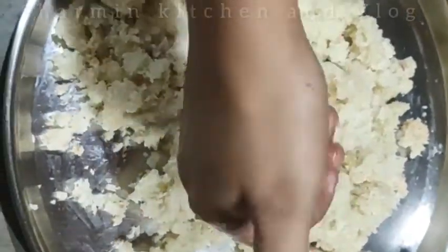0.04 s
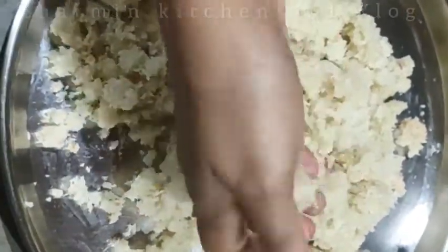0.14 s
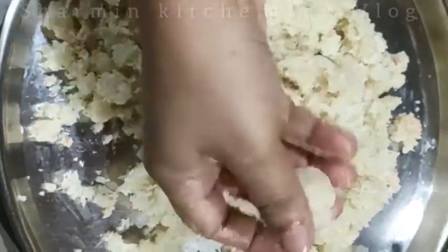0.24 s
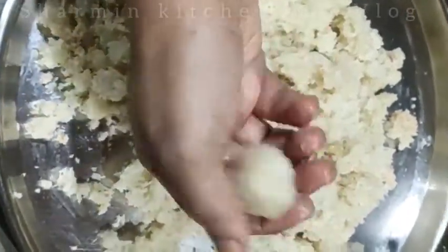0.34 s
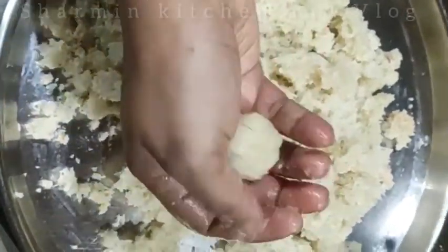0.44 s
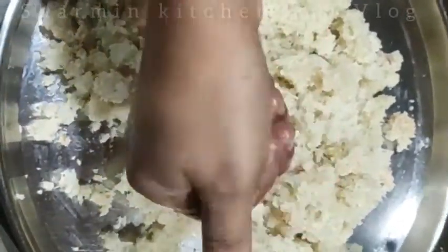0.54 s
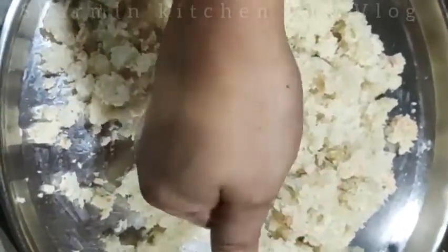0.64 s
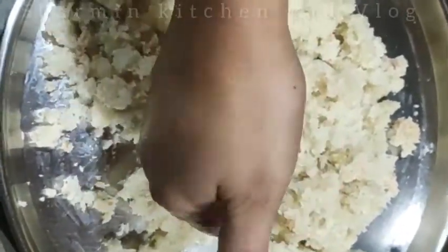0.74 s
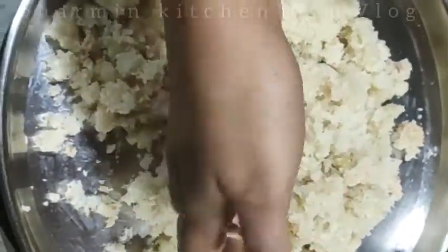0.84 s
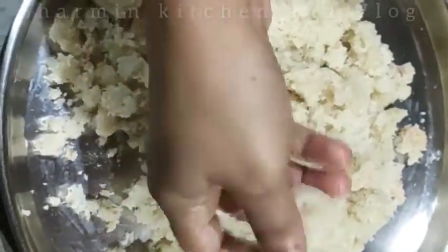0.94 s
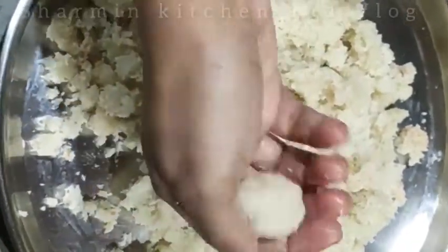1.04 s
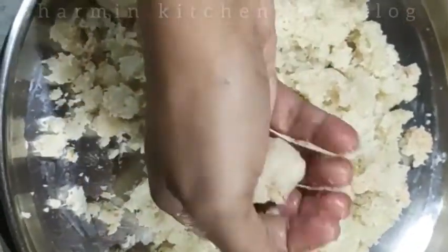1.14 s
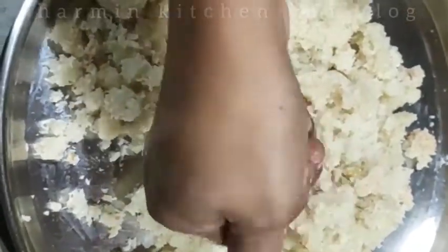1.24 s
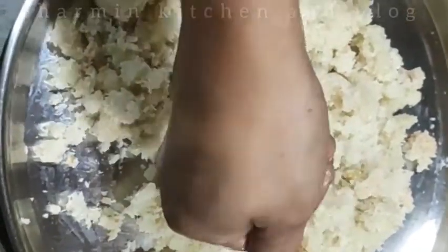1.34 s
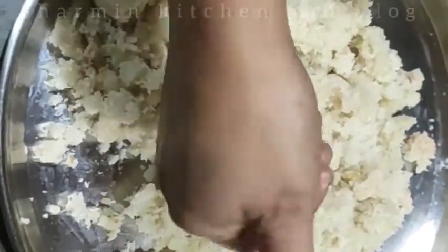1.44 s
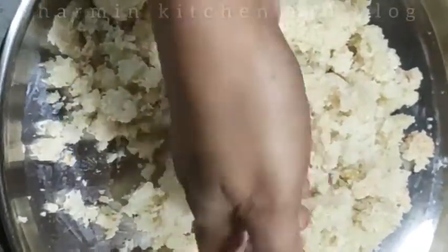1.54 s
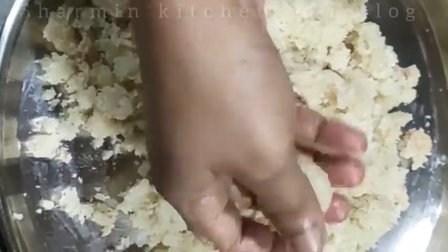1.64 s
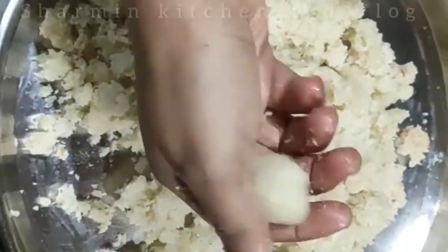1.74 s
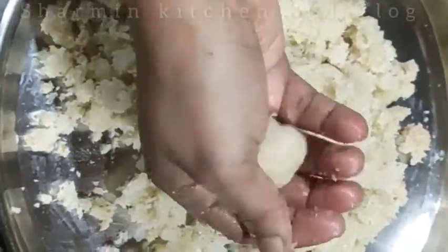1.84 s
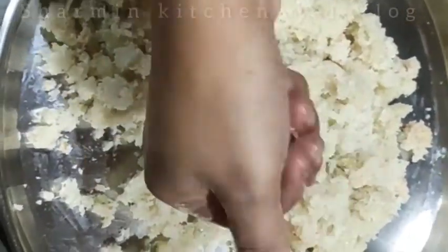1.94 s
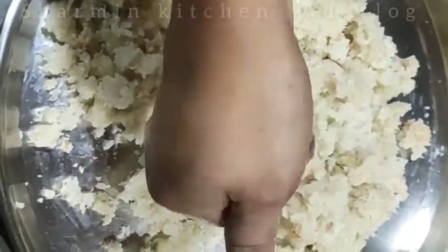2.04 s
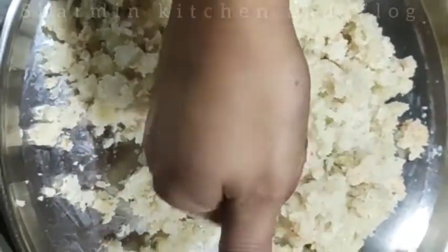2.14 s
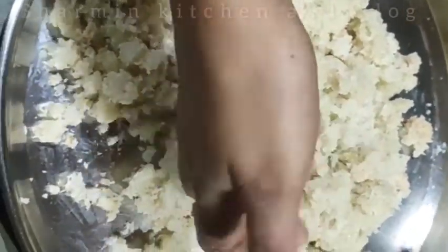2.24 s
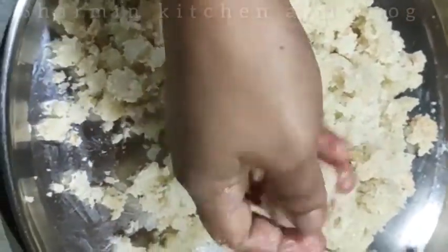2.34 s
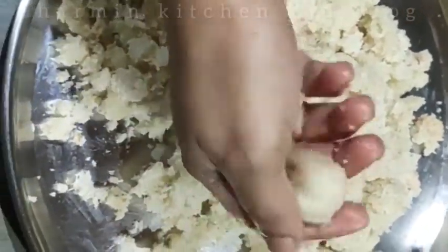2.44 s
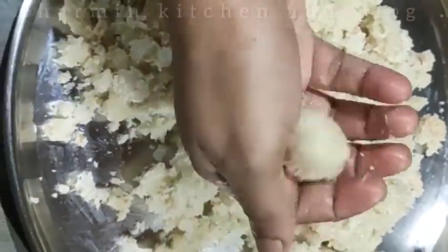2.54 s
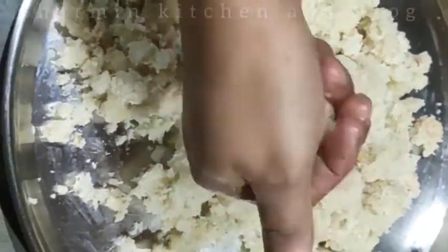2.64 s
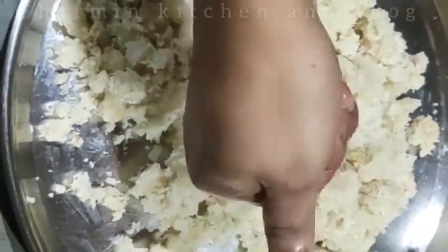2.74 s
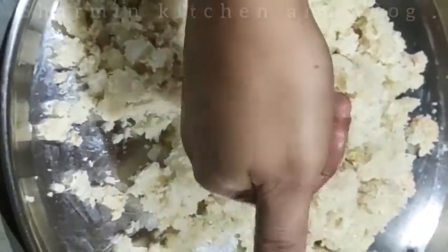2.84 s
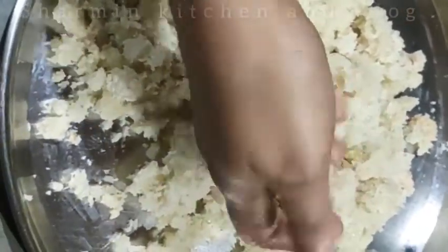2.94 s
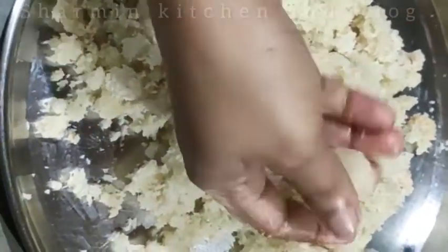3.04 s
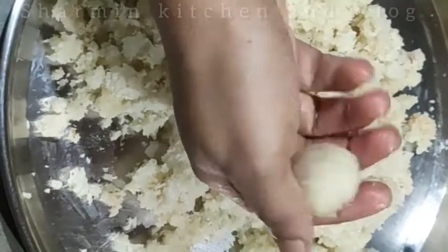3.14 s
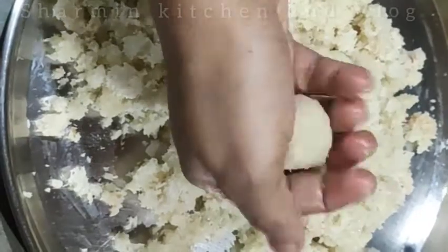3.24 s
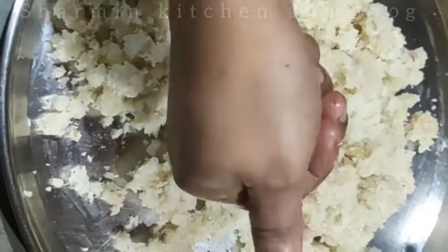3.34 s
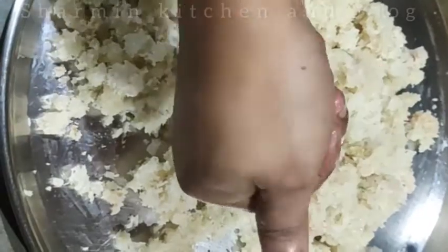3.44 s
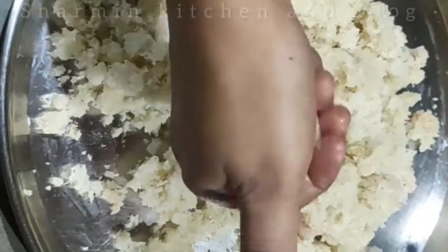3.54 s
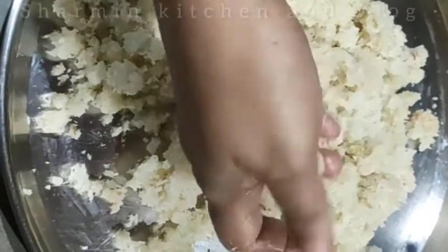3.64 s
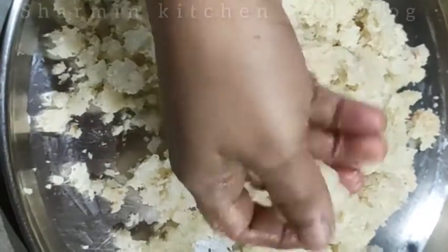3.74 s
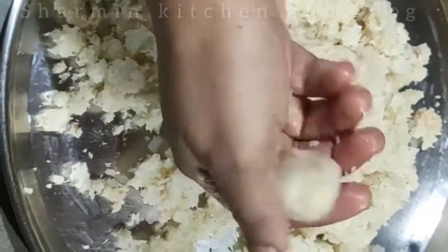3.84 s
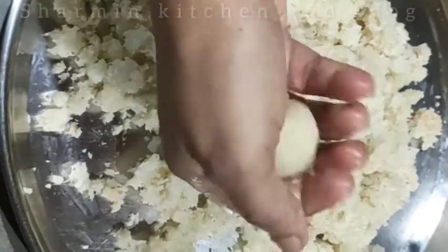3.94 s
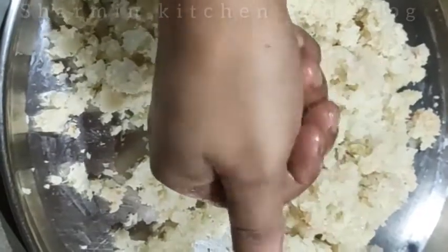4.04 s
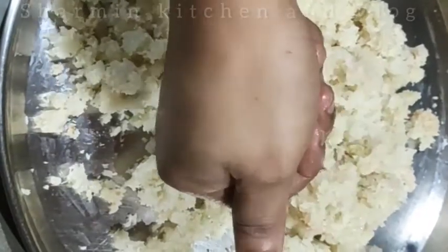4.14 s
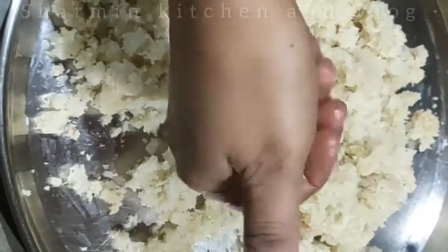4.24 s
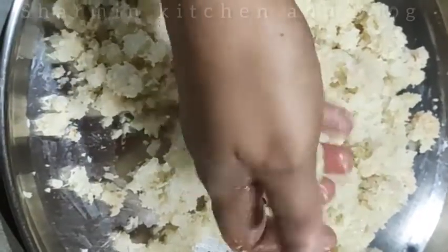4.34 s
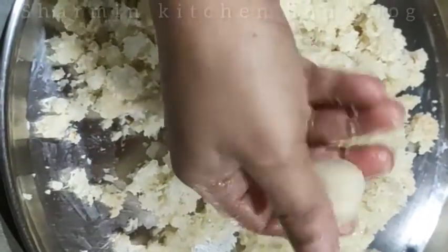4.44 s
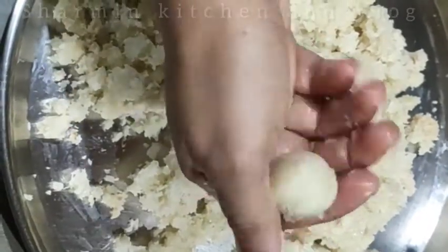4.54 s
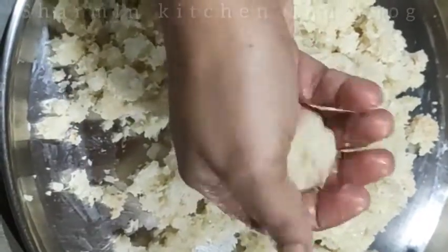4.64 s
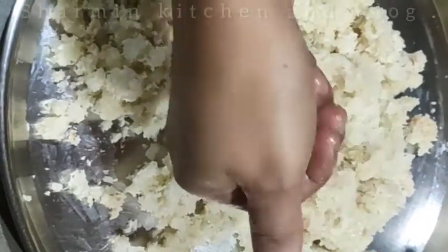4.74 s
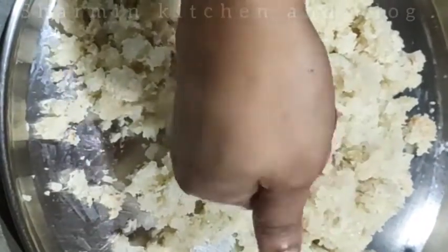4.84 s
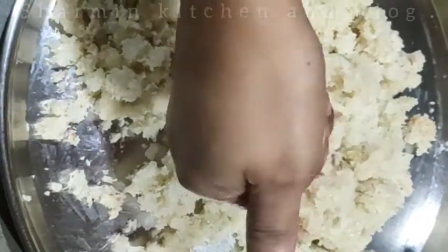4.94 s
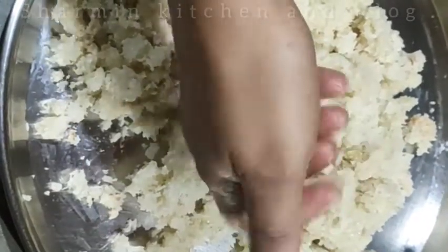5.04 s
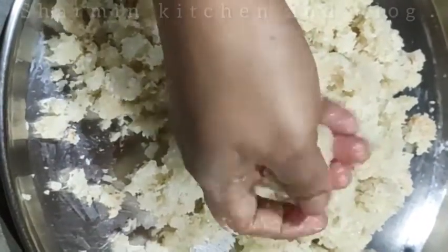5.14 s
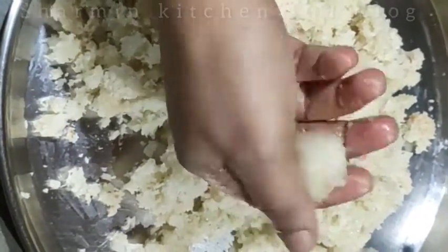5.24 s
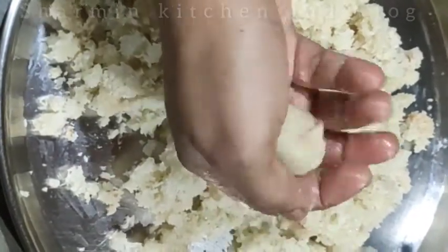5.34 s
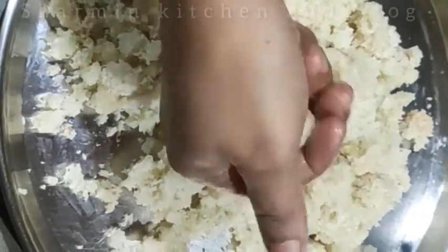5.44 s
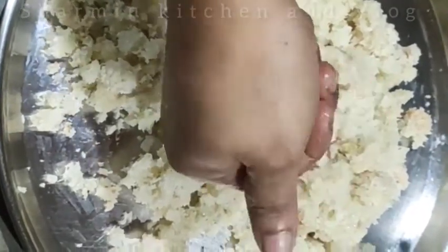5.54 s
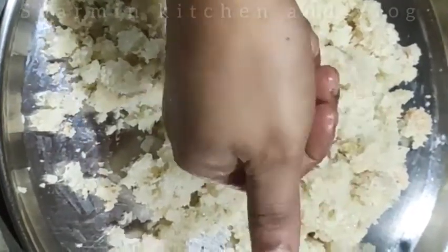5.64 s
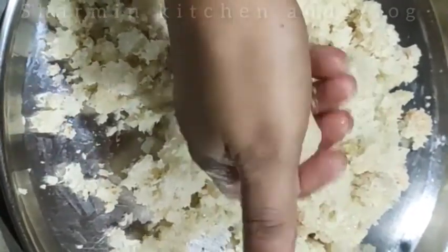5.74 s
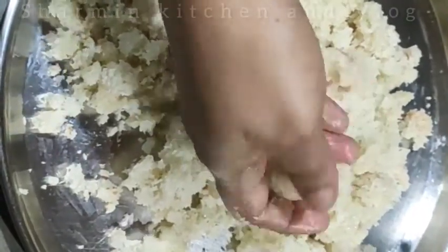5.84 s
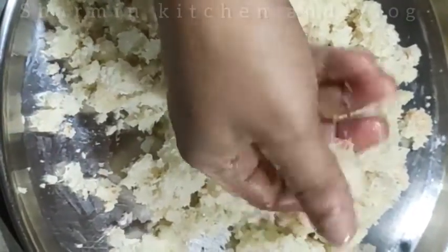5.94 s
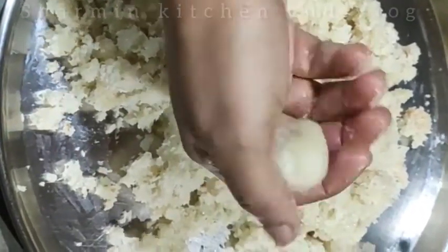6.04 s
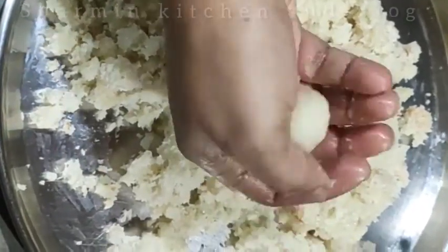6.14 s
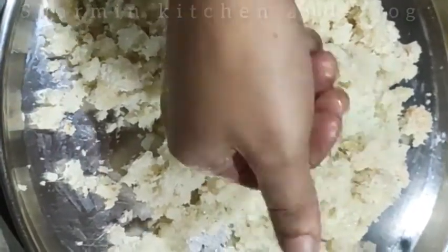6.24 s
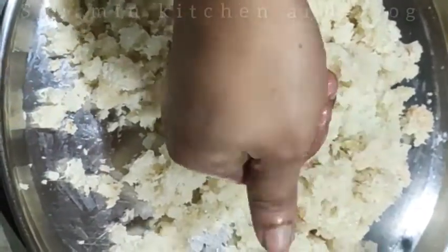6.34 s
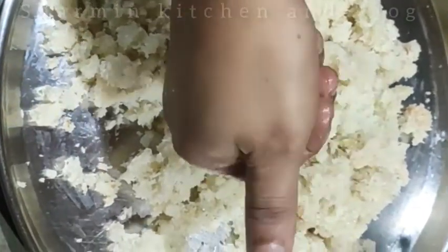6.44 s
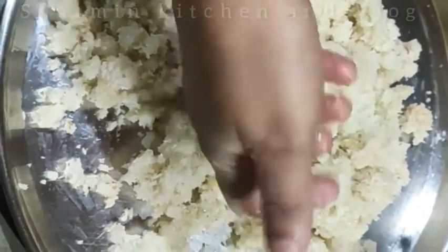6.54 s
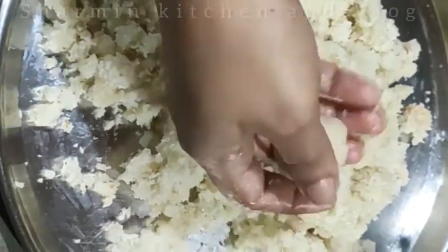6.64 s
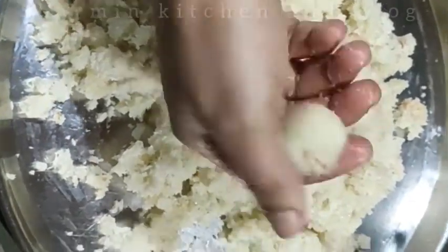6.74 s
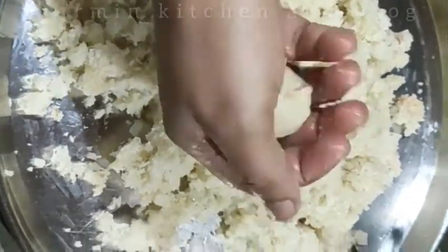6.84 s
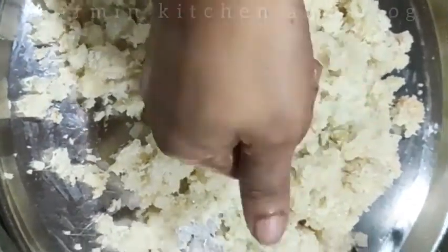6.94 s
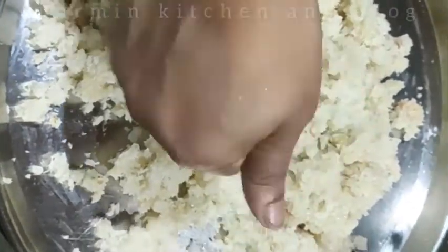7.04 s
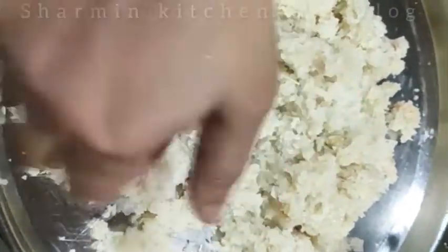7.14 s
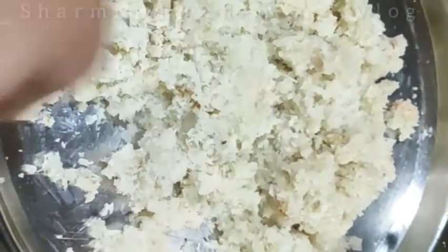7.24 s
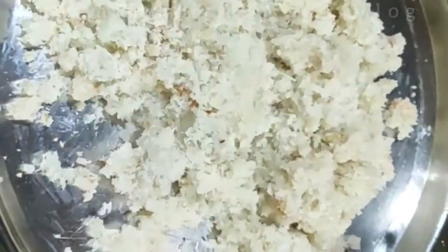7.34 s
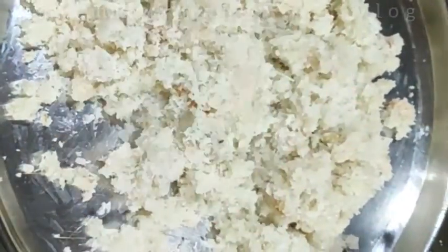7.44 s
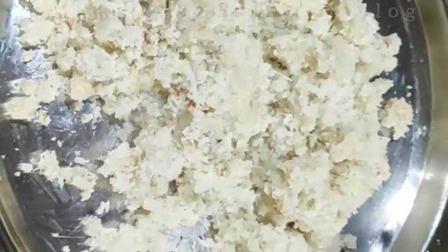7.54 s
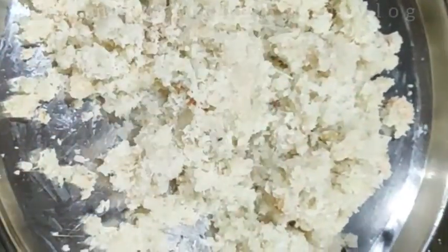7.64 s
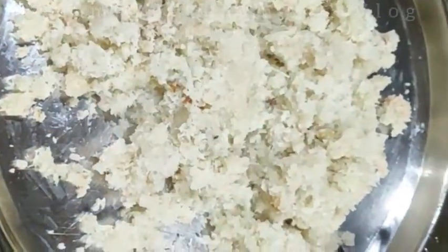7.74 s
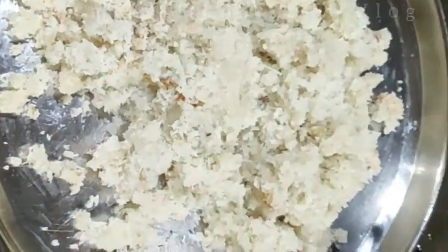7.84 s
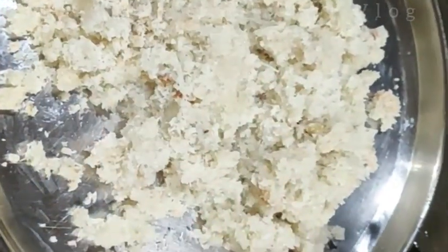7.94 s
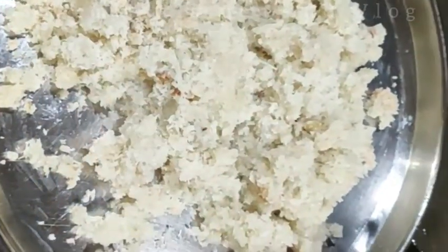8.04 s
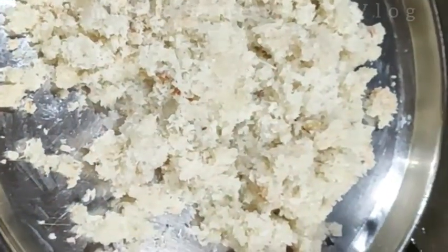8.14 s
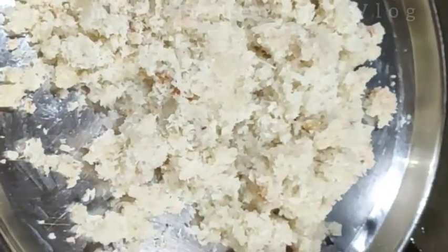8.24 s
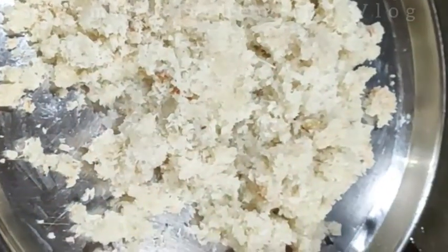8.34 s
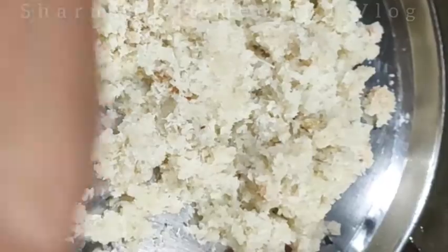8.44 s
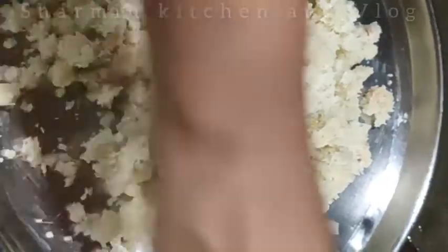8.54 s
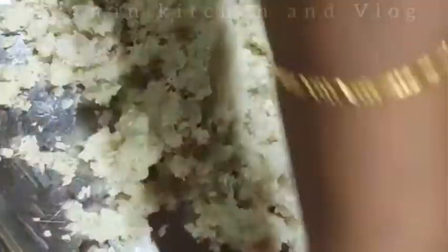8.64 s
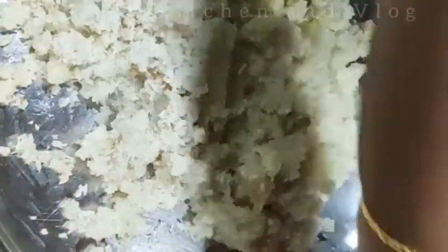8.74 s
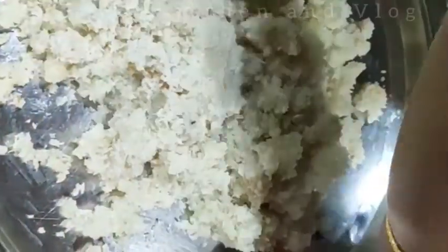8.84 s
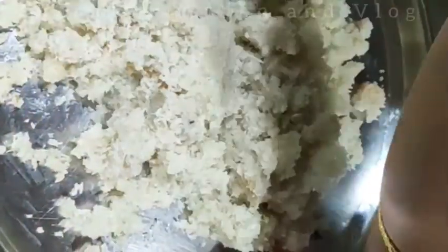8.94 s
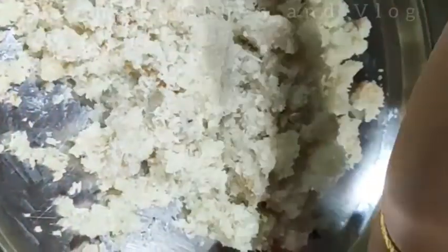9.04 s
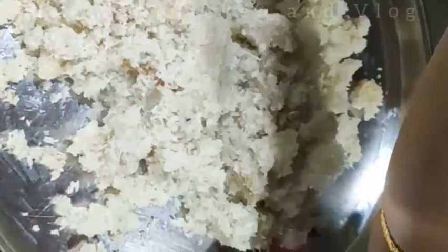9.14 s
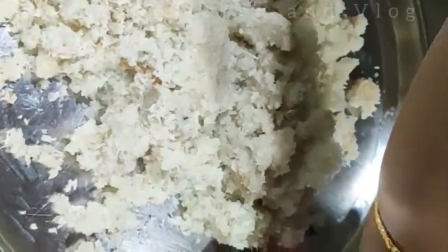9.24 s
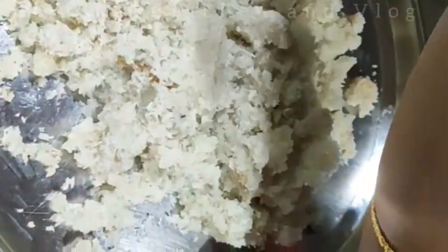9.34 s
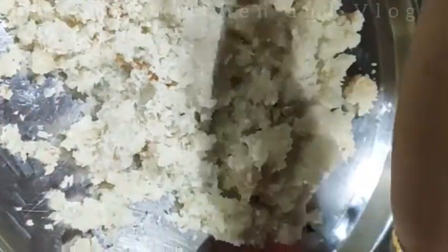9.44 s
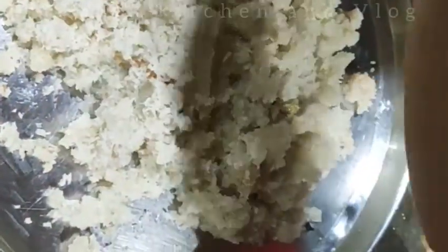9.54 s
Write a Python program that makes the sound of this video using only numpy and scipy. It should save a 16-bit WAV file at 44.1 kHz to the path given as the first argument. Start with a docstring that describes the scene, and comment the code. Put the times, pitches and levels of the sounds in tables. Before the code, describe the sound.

In a small hard-walled kitchen with low hum and very faint high whistles, damp coconut shreds crunch and squelch in bunched squeezes, dotted with wet clicks. A quieter passage has only slight rubbing and a few pops. Later, lumps and fingers thud on a steel plate, its ring muffled by the crumbs, and the last second brings louder gritty scrapes. Close stereo microphone, with brief low air rumbles.

```python
"""A hand squeezes sugared grated coconut above a steel plate in a small kitchen.
Throughout: filtered-noise room hum, thin narrow-band whistles and low gusts of air at the microphone.
From the start: moist shreds hiss and squelch as bunched random grains; sticky pops ring, skin squeaks and rubs.
From about 7 s: fingers knock, scrape and once squeak on the plate; blows and drag drive its damped resonances."""
import sys
import numpy as np
from scipy import signal
from scipy.fft import rfft, irfft, next_fast_len
from scipy.io import wavfile

SR = 44100
rng = np.random.default_rng(int(sys.argv[2]) if len(sys.argv) > 2 else 0)


def persist_wave(psi):
    """Save psi, clipped to +-1, as 16-bit WAV."""
    counts = np.round(np.clip(psi, -1, 1) * 32767).astype(np.int16)
    wavfile.write(sys.argv[1], SR, np.atleast_2d(counts).T)


N = 422919
TIME_S = np.arange(N) / SR
FFT_SIZE = next_fast_len(N + 8192, True)
BINS_HZ = np.maximum(np.fft.rfftfreq(FFT_SIZE, 1 / SR), 1)

# All table levels are relative: layer gains and the ports follow.
# In tables with hold_s, the rise ends at start_s.
# room spectrum: pitch_hz, density_db
ROOM_SPECTRUM = [(12, -24), (20, 6), (45, -5.5), (91, -16.5), (154, -12), (248, -23.5), (1220, -38),
                 (2260, -29.5), (2460, -40), (4060, -38.5), (5680, -39.5), (6360, -38), (16000, -38.5)]
# steady whistles: pitch_hz, width_hz, level_db
WHISTLES = [(160.7, 27, -68), (2495, 185, -71.5), (5680, 470, -71.5)]
# highest whistle: swells, slides up, fades, then returns faintly near its first pitch: time_s, pitch_hz, level_db
TOP_WHISTLE = [(0, 6900, -80), (2.7, 6900, -74), (2.9, 6880, -69.5), (4.8, 6880, -71.5), (4.88, 7200, -74),
               (4.96, 8100, -69), (5.08, 8600, -88), (6.2, 6950, -79)]
# air spectrum: pitch_hz, density_db
AIR_SPECTRUM = [(18, 5), (45, -0.5), (70, -13.5), (130, -17.5), (220, -32.5), (400, -39), (700, -71)]
# the moving arm pushes air over the microphone: start_s, hold_s, level_db
GUSTS = [(1.02, 0.055, -41), (1.2, 0.21, -45), (1.5, 1.63, -54.5), (3.53, 0.02, -48), (3.75, 0.18, -51),
         (6.78, 0.22, -48.5), (9.1, 0.21, -50.5)]
# small dull taps near the microphone: start_s, peak_db
TAPS = [(6.143, -45), (6.511, -37)]
# skin rubs on skin as the ball is turned: start_s, hold_s, level_db
RUBS = [(0.0, 2.82, -66), (3.3, 0.43, -73), (5.05, 0.6, -71), (6.1, 0.94, -70.5)]
# short squeaks of skin, the last a finger on the steel plate: start_s, length_s, first_hz, last_hz, level_db
SQUEAKS = [(2.536, 0.044, 2700, 1630, -55), (3.456, 0.047, 1420, 1470, -60.5), (4.718, .1, 1700, 1780, -70),
           (9.049, 0.012, 2480, 2010, -25)]
# loaded steel plate modes: pitch_hz, width_hz, level_db
PLATE_MODES = [(242.6, 14, -14), (908, 21, -2), (1272, 24, 3.5), (1307, 48, 6), (1670, 21, -1),
               (1750, 38, -1), (1824, 102, 8), (2090, 130, 4), (2140, 130, 1), (2283, 74, 6.5),
               (2440, 92, 5), (2700, 42, -14), (2910, 63, 3.5), (3180, 33, -19), (3375, 27, 2),
               (3760, 24, -2.5), (4390, 70, -4), (4900, 320, -13.5), (6000, 150, -12)]
# fingers and lumps meet the plate: start_s, peak_db, thud_db, crunch_db
KNOCKS = [(7.015, -23, -28, -12), (7.171, -29, -34, -5), (7.543, -33, -31, -11), (7.822, -34, -8.5, -21),
          (8.005, -34, -8.5, -14), (8.1816, -23.5, -19, -25.5), (8.554, -29.5, -33, -45),
          (8.722, -29.5, -26, -21), (8.7798, -21.5, -32, -21), (9.051, -19.5, -29.5, -28),
          (9.0864, -19.5, -46, -19), (9.456, -19.5, -34, -18)]
# fingers drag crumbs over steel: start_s, hold_s, friction_db, pressure_db (low modes)
STROKES = [(7.41, 0.036, -46, -53), (7.54, 0.023, -50, -51.5), (7.63, 0.068, -46.5, -59),
           (7.85, 0.12, -49.5, -57.5), (8.728, 0.013, -51, -73), (8.78, .11, -36.5, -47.5),
           (8.935, 0.04, -36.5, -48), (9.05, 0.043, -40.5, -48), (9.137, 0.026, -33.5, -37.5),
           (9.2, 0.054, -32, -39), (9.28, 0.12, -34, -40.5), (9.457, 0.0053, -31, -34.5),
           (9.525, 0.054, -32, -41)]
# sugar crunch spectrum: pitch_hz, density_db
CRUNCH_SPECTRUM = [(100, -28), (260, -4.5), (420, -11.5), (650, -31), (1050, -11), (1500, -21), (3000, 6),
                   (5000, -13), (6400, -6), (7300, -3), (10000, -8), (16000, -6.5)]
# loudest sticky pops in the palm: start_s, peak_db, pitch_hz, snap_db
POPS = [(1.624, -28, 8630, -16), (1.6438, -24.5, 2700, -22.5), (1.723, -23, 1980, -15),
        (1.937, -25, 2500, -13), (2.09, -25, 3000, -21), (2.3122, -30.5, 3180, -14),
        (2.55, -32.5, 2770, -31), (3.083, -39.5, 6900, -20), (3.312, -40, 2600, -27),
        (5.5607, -27, 2040, -7), (5.629, -28.5, 2800, -12), (6.3663, -28.5, 2440, -3),
        (7.2, -20, 2170, -19), (8.291, -34, 2910, -12), (8.494, -35, 3000, -30), (8.645, -21.5, 3350, -11)]
# the hand closes and shreds slide: start_s, hold_s, hiss_db (dry), squelch_db (moist)
SQUEEZES = [(0.02, 0.091, -54.5, -59.5), (0.22, 0.3, -56, -59), (0.56, 0.12, -45.5, -54.5),
            (0.84, 0.03, -48.5, -54), (1.3, 0.23, -52.5, -59), (1.61, .23, -51.5, -54),
            (1.93, 0.076, -48, -49), (2.1, 0.11, -48.5, -53), (2.38, 0.044, -67, -62.5),
            (2.62, 0.052, -51, -57.5), (3.28, .04, -67, -64.5), (3.45, 0.89, -75, -88),
            (4.96, 0.066, -70, -80), (5.4, 0.057, -74, -67.5), (5.585, .03, -52.5, -54),
            (5.715, 0.015, -47.5, -73), (5.785, 0.014, -73, -61), (6.26, 0.048, -65.5, -70),
            (6.555, 0.011, -60.5, -71), (6.735, .02, -60, -62), (6.81, 0.11, -52.5, -54),
            (7.08, .26, -52, -53), (7.42, 0.57, -51.5, -48.5), (8.07, 0.067, -57, -59),
            (8.28, 0.083, -62.5, -61), (8.43, 0.11, -83, -60.5), (8.62, 0.06, -60, -57)]
# dry shred spectrum: pitch_hz, density_db
HISS_SPECTRUM = [(300, -4), (1000, -18.5), (2000, -3), (4000, -1.5), (6400, -2), (7200, 3), (9000, -0.5),
                 (12000, -1.5), (16000, -4)]
# moist shred spectrum: pitch_hz, density_db
SQUELCH_SPECTRUM = [(150, -11.5), (300, -13), (550, -2.5), (900, -4.5), (1400, -0.5), (1900, -4), (2400, 1),
                    (3100, 2), (4000, -3.5), (6000, -7.5), (15000, -30)]
# left-right likeness of the room: pitch_hz, likeness (0-1)
ROOM_LIKENESS = [(40, 0.54), (170, 0.93), (280, 0.61), (900, 0.18), (9000, 0.049), (14000, 0.95)]
# left-right likeness of the plate: pitch_hz, likeness (0-1)
PLATE_LIKENESS = [(200, 1), (1350, 0.81), (1800, 0.18), (3000, 0.15), (6500, 0.15)]
# left-right likeness of the palm: pitch_hz, likeness (0-1)
PALM_LIKENESS = [(200, 1), (1500, 0.69), (2500, 0.46), (6500, 0)]
# port response difference: pitch_hz, left_minus_right_db
PORT_BALANCE = [(200, 1), (1300, 0.5), (2000, 6), (2800, 9.5), (3300, 7.5), (4300, 3), (5200, -3),
                (6500, 4.5)]

GUST_RISE_DB_PER_S, GUST_FALL_DB_PER_S, CALM_AIR_DB = 192, 63, -58.5
TOP_WHISTLE_CUTOFF_HZ = 160
RUB_RISE_DB_PER_S, RUB_FALL_DB_PER_S = 150, 91
LOW_MODES_BELOW_HZ = 1500
YIELD_S, CRUMBLE_S = 0.0021, 0.0079   # a struck lump starts to give, then crumbles
STROKE_RISE_DB_PER_S, STROKE_FALL_DB_PER_S = 798, 286
POP_LEFT_MINUS_RIGHT_DB = -0.5
SMALL_POPS_PER_S, SMALL_POP_DB = 51, -9   # level against the squelch
SQUEEZE_RISE_DB_PER_S, SQUEEZE_FALL_DB_PER_S = 155, 114
RESTING_HISS_DB, RESTING_SQUELCH_DB = -79, -73   # the ball never lies quite still
PALM_LAG_S = 16 / SR   # left after right
KITCHEN_T60_S = 0.26
MERGE_HZ, PALM_TOP_SHARING, PLATE_TOP_SHARING = 7000, 0.89, 0.37   # sharing 0-1 above MERGE_HZ
CUTOFF_HZ = 15900


def from_db(db):
    """Decibels to gain."""
    return 10 ** (np.asarray(db) / 20)


def rms_one(x):
    """Scale to unit power."""
    return x / np.sqrt(np.mean(x ** 2) + 1e-20)


def at_bins(points):
    """Read a table on a log-frequency axis."""
    hz, value = np.transpose(points)
    return np.interp(np.log(BINS_HZ), np.log(hz), value)


def filtered(x, response):
    """Apply a frequency response."""
    return irfft(rfft(x, FFT_SIZE) * response, FFT_SIZE)[..., :N]


def coloured(x, spectrum):
    """Shape by a spectrum; rms 1."""
    return rms_one(filtered(x, from_db(at_bins(spectrum))))


def cut(x, hz, kind, order=2):
    """Butterworth filter."""
    return signal.sosfilt(signal.butter(order, hz, kind, fs=SR, output="sos"), x + 1e-18)


def resonate(x, hz, width_hz):
    """One resonance with about unit gain at its top."""
    radius = np.exp(-np.pi * width_hz / SR)
    zeros = np.array([1, 0, -1]) * (1 - radius ** 2) / 2
    poles = [1, -2 * radius * np.cos(2 * np.pi * hz / SR), radius ** 2]
    return signal.lfilter(zeros, poles, x + 1e-18)


def drift(rate_hz):
    """Slow random wander with rms 1."""
    return rms_one(filtered(rng.standard_normal(N), 1 / (1 + (BINS_HZ / rate_hz) ** 2)))


def two_ports(pair, likeness):
    """Mix two signals into a partly alike left and right."""
    alike = np.clip(at_bins(likeness), 0, 1)
    middle = filtered(pair[0], np.sqrt((1 + alike) / 2))
    side = filtered(pair[1], np.sqrt((1 - alike) / 2))
    return middle + side * [[1], [-1]]


def grains(per_s, spread_db, clump_db, clump_rate_hz):
    """Tiny slips of uneven size, bunched by stick and slip; each radiates two unrelated ways."""
    born = rng.random(N) < per_s / SR
    sizes = from_db(spread_db * np.minimum(rng.exponential(1, N), 5))
    clumps = from_db(clump_db * drift(clump_rate_hz))
    return rms_one(born * sizes * clumps * rng.standard_normal((2, N)))


def swells(rows, rise_db_per_s, fall_db_per_s):
    """Rise, hold and decay; overlaps add in power. One gain track per dB column."""
    rows, t = np.array(rows), TIME_S[::32]
    start, hold = rows[:, :1], rows[:, 1:2]
    rise_db = -rise_db_per_s * np.maximum(start - t, 0)
    fall_db = -fall_db_per_s * np.maximum(t - start - hold, 0)
    tracks = []
    for db in rows.T[2:]:
        gain = np.linalg.norm(from_db(db[:, None] + rise_db + fall_db), axis=0)
        tracks.append(np.interp(TIME_S, t, gain))
    return tracks


def burst(t, rise_s, fall_s):
    """Exponential build-up to time zero and decay after it."""
    return np.exp(np.minimum(t / rise_s, -t / fall_s))


def add(out, s, sound):
    """Lay a short sound into a track."""
    start = round(s * SR)
    out[:, start:start + sound.shape[-1]] += sound[..., :N - start]


def room():
    """Room rumble and hum: noise shaped by a spectrum."""
    noise = two_ports(rng.standard_normal((2, N)), ROOM_LIKENESS)
    return from_db(-58.5) * coloured(noise, ROOM_SPECTRUM)


def whistle(hz, width_hz):
    """Noise held in two equal narrow resonances."""
    once = resonate(rng.standard_normal((2, N)), hz, width_hz)
    return rms_one(resonate(once, hz, width_hz))


def top_whistle():
    """A narrow band of noise carried on a gliding pitch."""
    s, hz, db = np.transpose(TOP_WHISTLE)
    flutter = cut(rng.standard_normal((2, 2, N)), TOP_WHISTLE_CUTOFF_HZ, "low")
    phase = 2 * np.pi * np.cumsum(np.interp(TIME_S, s, hz)) / SR
    tone = rms_one(flutter[0] * np.cos(phase) + flutter[1] * np.sin(phase))
    return from_db(np.interp(TIME_S, s, db)) * tone


def moving_air():
    """Low turbulent noise; stronger gusts lean to the right port and break into smaller, higher eddies."""
    gust_gain, = swells(GUSTS, GUST_RISE_DB_PER_S, GUST_FALL_DB_PER_S)
    air_gain = np.hypot(gust_gain, from_db(CALM_AIR_DB))
    noise = two_ports(rng.standard_normal((2, N)), ROOM_LIKENESS)
    air = air_gain * coloured(noise, AIR_SPECTRUM)
    gust = np.clip(air_gain / from_db(-42.5), 0, 1)
    air = air + from_db(8.0) * gust ** 2 * resonate(air, 69, 85)
    return air * from_db(np.array([2.5 - 14 * gust, -.8 + 6 * gust]))


def background():
    """Room and whistles, slightly to the left, plus moving air."""
    tones = sum(from_db(db) * whistle(hz, width) for hz, width, db in WHISTLES) + top_whistle()
    return (room() + two_ports(tones, ROOM_LIKENESS)) * from_db([[.8], [-.8]]) + moving_air()


def taps():
    """A single dull pulse with a brief low swing."""
    out, t = np.zeros((2, N)), TIME_S[:SR // 20]
    pulse = cut(cut(1.0 * (t == 0), 400, "low", order=1), 130, "high")
    for s, db in TAPS:
        add(out, s + 0.0013, from_db(db + 2.5) * pulse / pulse.max())
    return out


def skin():
    """Fingers slide over the ball of the thumb: grains through one dull resonance."""
    gain, = swells(RUBS, RUB_RISE_DB_PER_S, RUB_FALL_DB_PER_S)
    slips = grains(per_s=3000, spread_db=2.5, clump_db=0.5, clump_rate_hz=26)
    rub = resonate(two_ports(slips, PALM_LIKENESS), 512, 135)
    return from_db(-3.0) * rms_one(rub) * gain


def squeaks(rasp_hz=220):
    """Uneven stick and slip gives a short rasping glide."""
    out = np.zeros((2, N))
    for s, length_s, first_hz, last_hz, db in SQUEAKS:
        n = round(length_s * SR)
        phase = 2 * np.pi * np.cumsum(np.linspace(first_hz, last_hz, n)) / SR
        rasp = rms_one(cut(rng.standard_normal(n), rasp_hz, "low") * np.sin(phase))
        add(out, s, from_db(db) * rasp * np.sin(np.linspace(0, np.pi, n)))
    return out


def plate(force, low_force):
    """Plate modes, damped by the coconut on it; the low ones need a firmer push."""
    force = cut(force, 750, "high")
    ring = 0
    for hz, width, db in PLATE_MODES:
        drive = low_force if hz < LOW_MODES_BELOW_HZ else force
        ring = ring + from_db(db) * resonate(drive, hz, width)
    return ring


def knocks(crumble_db=-13, thud_db=14, crunch_db=9, level_db=1.0, finger_hz=4400, firm_db=-18):
    """A soft blow and short crumbling drive the plate; a firm one strikes sharply, wakes low modes and thuds."""
    out, t = np.zeros((2, N)), np.arange(-SR // 50, SR // 4) / SR
    for s, db, thud, crunch in KNOCKS:
        sparse = rng.standard_normal((2, len(t))) * (rng.random(len(t)) < .25)
        crumbs = sparse * burst(t, YIELD_S, CRUMBLE_S)
        firmness = from_db(min(thud - firm_db, 0) / 2)
        force = cut(firmness * (t == 0) + from_db(crumble_db) * crumbs, finger_hz, "low", order=4)
        ring = plate(force, from_db(2.5) * force) + from_db(6.0) * resonate(force, 1900, 570)
        # the thud is one push, the same at both ports
        push = force.mean(axis=0)
        body = cut(plate(0 * push, push) + from_db(-9.5) * cut(push, 210, "high"), 1130, "low")
        lowest = resonate(push, *PLATE_MODES[0][:2])
        body = rms_one(body) + from_db(-7.5) * rms_one(lowest)
        crackle = rms_one(cut(crumbs, 3500, "high"))
        blow = rms_one(ring) + from_db(thud + thud_db) * body + from_db(crunch + crunch_db) * crackle
        add(out, s + t[0] + 0.001002, from_db(db + level_db) * blow / np.abs(blow).max())
    return out


def scrapes(friction, pressure, snap_db=-6):
    """Dragged shreds keep the plate modes alive; lumps break now and then, and sugar crystals crunch."""
    clumps = from_db(1.5 * drift(43))
    slips = grains(per_s=5000, spread_db=0.7, clump_db=-0.1, clump_rate_hz=58)
    breaks = grains(per_s=110, spread_db=0.5, clump_db=0.5, clump_rate_hz=25)
    drag = clumps * two_ports(rms_one(slips + from_db(snap_db) * breaks), PLATE_LIKENESS)
    crystals = grains(per_s=2200, spread_db=-2.0, clump_db=1.5, clump_rate_hz=9.6)
    crystals = clumps * two_ports(crystals, PLATE_LIKENESS)
    ring = plate(friction * drag, from_db(9.5) * pressure * drag) / np.std(plate(drag, drag))
    crunch = friction * coloured(crystals, CRUNCH_SPECTRUM)
    return from_db(-0.5) * ring + from_db(-7.0) * crunch


def pops(cycles=2.4, stretch_s=0.00089, crackle_s=0.0038, crackle_db=-17, snap_db=12):
    """A sticky film stretches and parts: a pocket rings a few cycles and nearby shreds crackle."""
    out, t = np.zeros((2, N)), np.arange(-SR // 100, SR // 20) / SR
    pan_db = POP_LEFT_MINUS_RIGHT_DB * np.array([[.5], [-.5]])
    for s, db, hz, snap in POPS:
        crackle = rng.standard_normal(len(t)) * burst(t, stretch_s, crackle_s)
        force = (t == 0) + from_db(crackle_db) * crackle
        pocket = rms_one(resonate(force, hz, hz / cycles))
        pop = pocket + from_db(snap + snap_db) * rms_one(cut(force, 2400, "high"))
        add(out, s + t[0], pop / np.abs(pop).max() * from_db(db + pan_db))
    return out


def small_pops(count=6):
    """Tiny wet pockets part at random, each ringing a few cycles at one of six pitches; rms 1."""
    pitches_hz = np.geomspace(1900, 3600, count)
    slips = grains(per_s=SMALL_POPS_PER_S, spread_db=0.0, clump_db=-2.5, clump_rate_hz=8)
    dealt = rng.integers(0, count, N)
    rings = sum(resonate(slips * (dealt == k), hz, hz / 2.5) for k, hz in enumerate(pitches_hz))
    return rms_one(two_ports(rings, PALM_LIKENESS))


def palm(scraping):
    """Dense dry slips hiss; sparser wet ones squelch in the hollow of the hand."""
    hiss_gain, squelch_gain = swells(SQUEEZES, SQUEEZE_RISE_DB_PER_S, SQUEEZE_FALL_DB_PER_S)
    hiss_gain = np.hypot(hiss_gain, from_db(RESTING_HISS_DB))
    squelch_gain = np.hypot(squelch_gain, from_db(RESTING_SQUELCH_DB))
    dry_slips = grains(per_s=14000, spread_db=1.5, clump_db=2.0, clump_rate_hz=27)
    wet_slips = grains(per_s=4000, spread_db=1.0, clump_db=2.5, clump_rate_hz=17)
    hiss = coloured(two_ports(dry_slips, PALM_LIKENESS), HISS_SPECTRUM)
    squelch = coloured(two_ports(wet_slips, PALM_LIKENESS), SQUELCH_SPECTRUM)
    wet = squelch + from_db(SMALL_POP_DB) * small_pops()
    # a light grip hardly squelches; the grip eases while the fingers work on the plate
    grip = squelch_gain ** 2 / (squelch_gain ** 2 + from_db(-76.0) ** 2)
    grip = grip / (1 + scraping / from_db(-48))
    sliding = hiss_gain ** 2 / (hiss_gain ** 2 + from_db(-79.0) ** 2)
    return from_db(2.5) * sliding * hiss_gain * hiss + from_db(0.5) * grip * squelch_gain * wet


def kitchen(x, count=7):
    """Feedback echoes between hard walls, different at each port."""
    sides = []
    for channel in x:
        echoes = 0
        for delay_s in rng.uniform(.009, .04, count):
            loop = from_db(-60 * delay_s / KITCHEN_T60_S) * np.exp(-2j * np.pi * BINS_HZ * delay_s)
            echoes = echoes + loop / (1 - loop)
        sides.append(filtered(channel, echoes / np.sqrt(count)))
    return cut(np.array(sides), 6500, "low", order=1)


def microphone(x, sharing):
    """Sound and echoes reach two ports of unlike response; above MERGE_HZ the right takes a share of the left."""
    x = x + from_db(-7.5) * kitchen(x)
    ported = filtered(x, from_db(at_bins(PORT_BALANCE) * np.array([[.5], [-.5]])))
    top = 1 / (1 + (MERGE_HZ / BINS_HZ.clip(MERGE_HZ / 2)) ** 60)
    share = np.clip(sharing, 0, 1)
    merged = np.array([x[0], share * x[0] + (1 - share) * x[1]])
    return filtered(ported, 1 - top) + filtered(merged, top)


def scene():
    """The hand is to the right of the microphone, the scraped part of the plate to the left."""
    friction, pressure = swells(STROKES, STROKE_RISE_DB_PER_S, STROKE_FALL_DB_PER_S)
    near = background() + taps() * from_db([[-3], [2.5]])
    steel = (knocks() + scrapes(friction, pressure)) * from_db([[.6], [-1.0]])
    hand = squeaks() + pops() + palm(friction)
    lag = np.exp(-2j * np.pi * BINS_HZ * PALM_LAG_S)
    hand = np.array([filtered(hand[0], lag), hand[1]]) + skin()
    return near + microphone(steel, PLATE_TOP_SHARING) + microphone(hand, PALM_TOP_SHARING)


def record(dry):
    """Cut the top steeply."""
    return signal.sosfilt(signal.ellip(14, .1, 85, CUTOFF_HZ, fs=SR, output="sos"), dry)


dry = scene()
out = record(dry)
persist_wave(out)
```